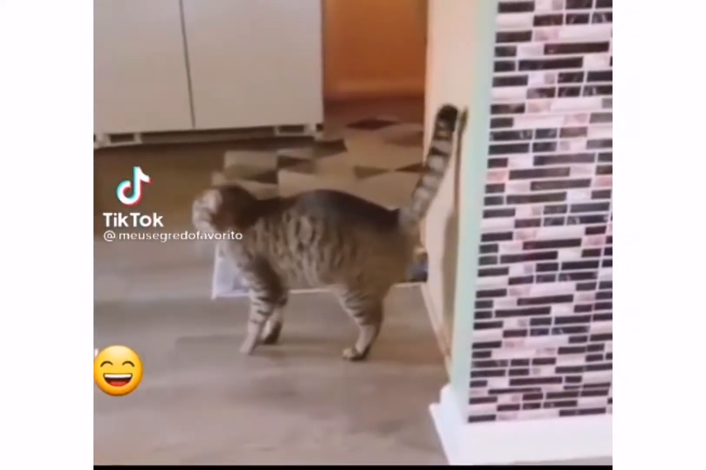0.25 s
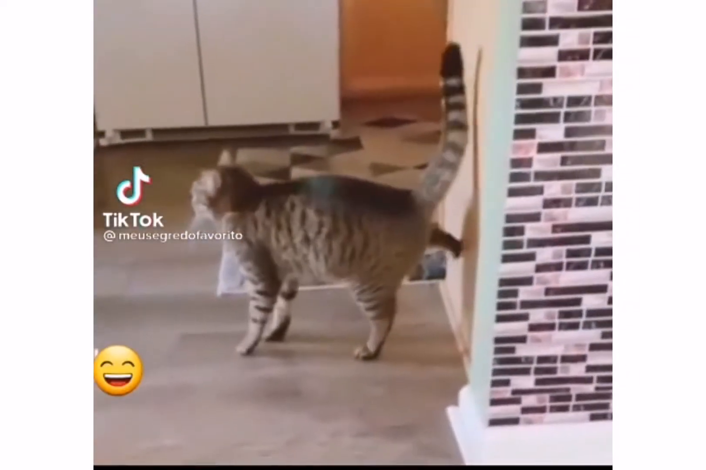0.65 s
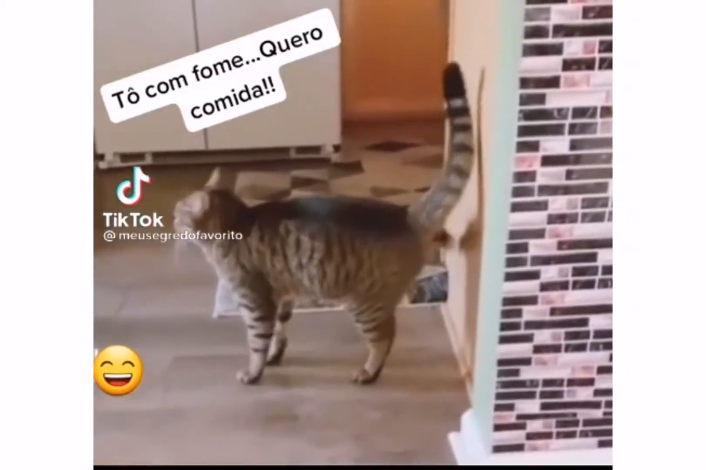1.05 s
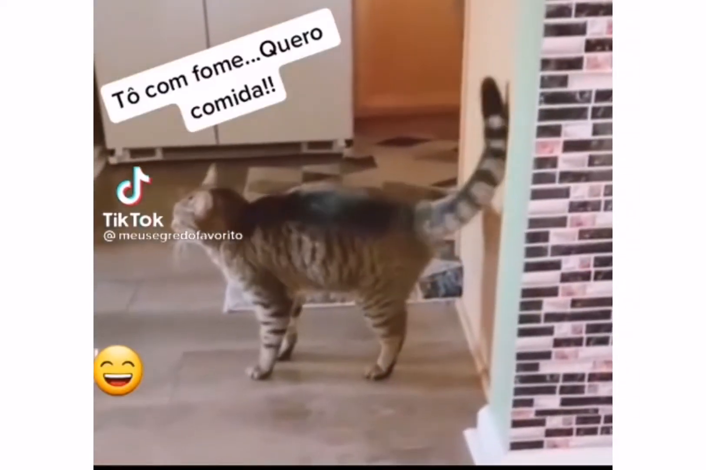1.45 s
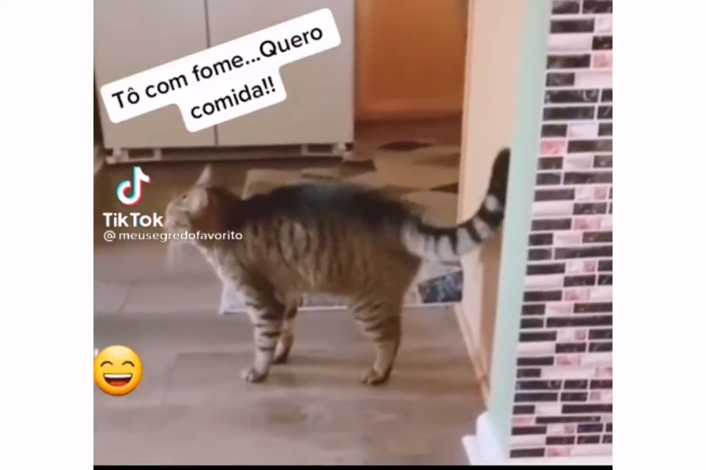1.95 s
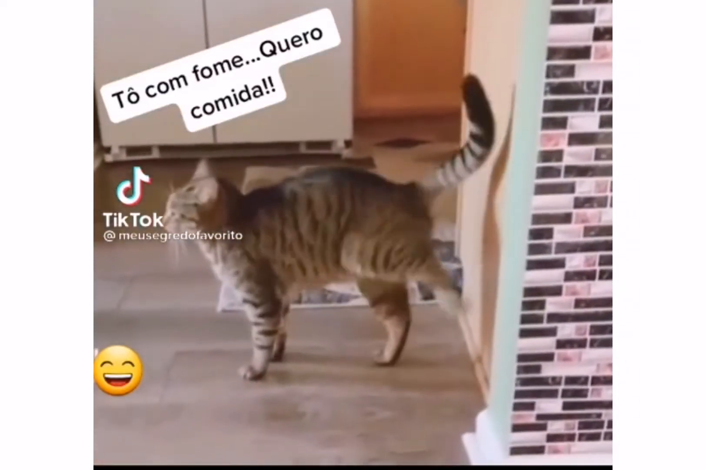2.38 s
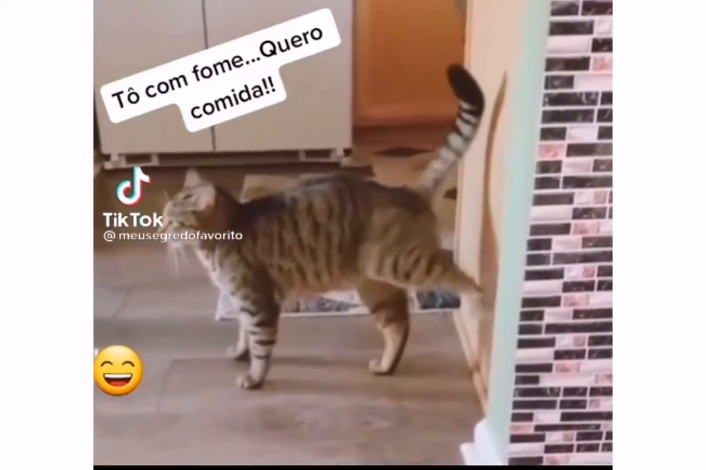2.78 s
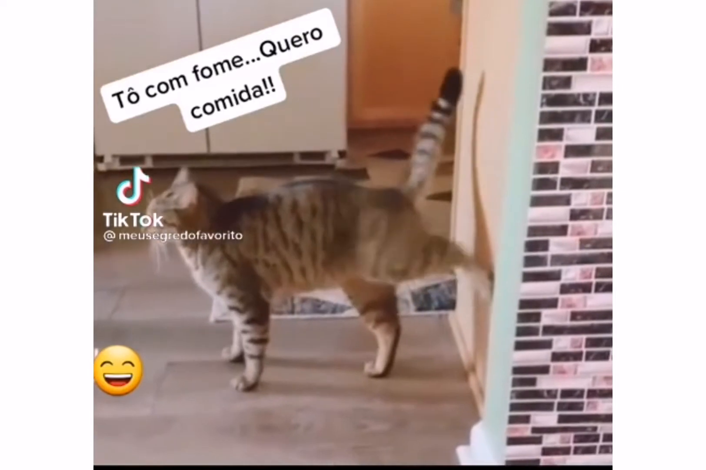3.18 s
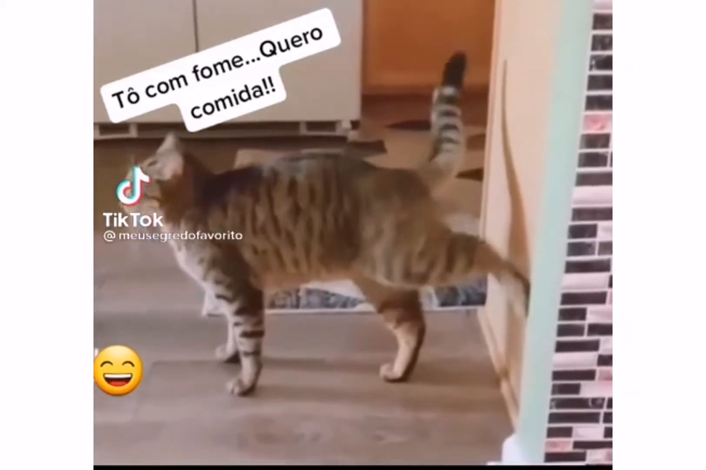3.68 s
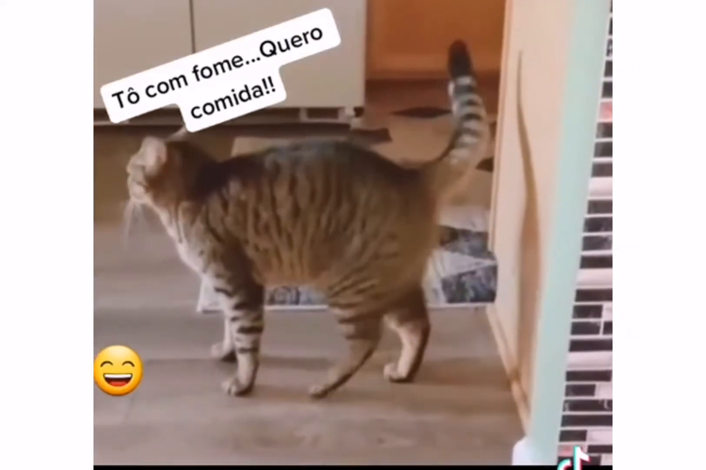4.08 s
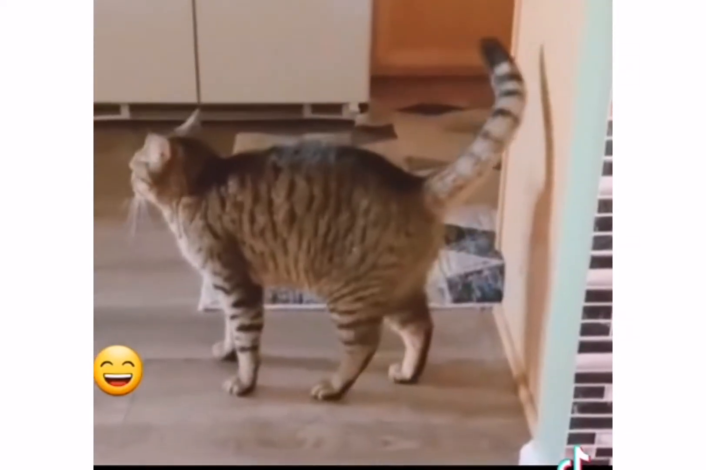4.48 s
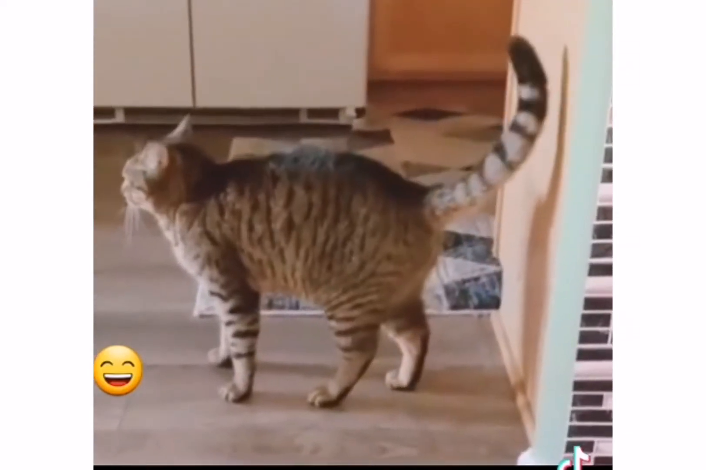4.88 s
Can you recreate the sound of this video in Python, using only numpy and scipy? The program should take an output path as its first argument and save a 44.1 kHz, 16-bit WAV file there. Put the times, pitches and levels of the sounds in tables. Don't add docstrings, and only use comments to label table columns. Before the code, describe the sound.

Fast, boomy paw thumps on a hollow door panel swell, stop, restart and stop, leaving soft ticks in a humming kitchen.

```python
import sys
import numpy as np
from scipy import signal
from scipy.fft import rfft, irfft
from scipy.io import wavfile

SR = 44100
rng = np.random.default_rng(int(sys.argv[2]) if len(sys.argv) > 2 else 0)


def volts_from_db(level):
    exponent = np.asarray(level, float) / 20
    return 10 ** exponent


def pcm_store(signal):
    levels = np.round(np.clip(np.atleast_2d(signal), -1, 1) * 32767)
    wavfile.write(sys.argv[1], SR, levels.astype(np.int16).T)


N = 226669

# panel push in seconds, kick level in dB, claw level in dB,
# pad firmness in dB, lean of the core to its low note in dB.
BOUT_1 = [(0.375, -30.5, -54, -4, 14.5), (0.4543, -14.5, -50, 0.5, 21), (0.538, -10.5, -37, -3, 24.5),
          (0.6217, -9, -39.5, -2.5, 12), (0.7077, -7.5, -38, 0, -15), (0.7987, -7, -36.5, 1.5, 3),
          (0.8783, -7, -40, 0.5, -24.5), (0.9699, -5.5, -36, 2.5, 0), (1.0641, -2, -36, -0.5, -23),
          (1.157, -1, -32, -1.1, -17), (1.261, 0.5, -33, 1, 17), (1.3695, -0.94, -31, 1.1, 19.5),
          (1.4723, 1, -33.5, 2, 0.5), (1.5855, 0.28, -33.5, 2, 5.5), (1.7121, -3.5, -37, 5, 30),
          (1.8437, -5, -36.5, 1, 35.5)]
BOUT_2 = [(2.4249, -31, -74.5, -17.5, 11.5), (2.486, -20, -56, 1, 6.5), (2.555, -15.5, -52, 9, 10.5),
          (2.6257, -10, -43, 5.5, 6.5), (2.707, -7, -36.5, 5.5, -5), (2.7854, -3.5, -29.5, 1.5, -12.5),
          (2.8687, -4.5, -30, 5, -21), (2.9527, -2.5, -33.5, 4, -2), (3.0387, -3, -33.5, 2.1, 12.5),
          (3.1258, -2, -32, -2, 4.5), (3.2164, -3, -32, 2.5, -9.5), (3.3128, -6, -39.5, 3, -3.5),
          (3.4078, -8, -35, 2, -10), (3.5051, -6.5, -33, 1.5, -1), (3.618, -6, -41, -2.5, 6)]
LANDING = [(3.813, -18.5, -53.5, -8, 29)]
# frequency in Hz, level in dB, T60 in seconds,
# start outward +1 or inward -1.
PANEL_MODES_1 = [(34.46, -29, 1, 1), (95.2, -11.5, 0.281, -1), (118.38, -8.5, 0.169, -1),
                 (142.17, -21.5, 0.043, 1), (166.6, -3.5, 0.0604, 1), (209.7, -17, 0.178, 1),
                 (230.5, -13, 0.217, 1), (281, -26.5, 0.219, -1), (352.6, -35.5, 0.717, -1),
                 (440, -25, 0.031, 1), (428, -77.5, 0.197, -1), (563.8, -33.5, 0.063, -1)]
PANEL_MODES_2 = [(27.8, -16, 0.334, 1), (93.3, -14.5, 0.204, 1), (114.66, -11, 0.1436, 1),
                 (118.84, -6, 0.173, 1), (136.96, 2, 0.0594, -1), (154.2, -58, 0.25, -1),
                 (211.8, -8, 0.186, 1), (234.5, -18, 0.451, 1), (272.64, -27, 0.8, 1),
                 (326.1, -21, 0.166, 1), (395.1, -23.5, 0.1296, 1), (440, -25.5, 0.034, 1),
                 (512, -17, 0.0137, -1)]
FOOT_MODES = [(64.5, -11.5, 0.323, 1), (123.9, -7, 0.235, 1), (152.4, -6, 0.223, -1),
              (210.4, -14.5, 0.24, 1), (334.3, -12.5, 0.127, -1), (420, -15, 0.124, 1),
              (472, -16, 0.104, -1), (594, -8.5, 0.0344, 1), (694, -31.5, 0.072, -1)]
# frequency in Hz, density in dB per Hz.
SLAP_COLOUR = [(180, -46), (300, 10.5), (372, 0.5), (584, -7), (787, -3), (1040, -10.5), (1780, -16.5),
               (2650, -22.5), (2880, -18), (3950, -24.5), (12300, -33), (15200, -46), (16000, -63)]
# frequency in Hz, width in Hz, height in dB.
FRAME_PEAKS = [(609.5, 68, 5), (832, 246, -6), (1073.4, 84, 3), (1446, 91, 3), (1940, 98, 2),
               (2455, 213, 4), (2800, 79, 1.5)]
# time in seconds, skin over claws in dB, low core note in Hz,
# its upward glide as a share, high core note in Hz.
PAW_LIE = [(0.499, -7, 498.3, 0.193, 918), (0.78, 3, 492.2, 0.155, 922.2), (1.07, 14.5, 454.8, 0.094, 923),
           (1.14, 12, 616, 0.244, 1091), (1.6, 12.5, 624.2, 0.2723, 1094), (1.851, 8.5, 618.2, 0.215, 1096),
           (2.549, -2.5, 466.3, -0.154, 921), (2.72, 8, 473.6, -0.14, 1013),
           (3.05, 10.5, 442.6, -0.146, 1060), (3.2, 5.5, 467, -0.21, 1214), (3.5, 0.5, 440, -0.189, 1271),
           (3.8, 8, 440, -0.186, 1256)]
# time in seconds, level in dB, length in seconds.
BRUSH = (2.083, -56, 0.024)
# start in seconds, level in dB, length in seconds, ring in dB.
TICKS = [
    (3.61, -35, 0.0153, -4),
    (4.031, -41, 0.0079, -12),
    (4.047, -39, 0.0073, -10.5),
    (4.284, -44, 0.0045, -13),
    (4.364, -40, 0.014, -5.5),
    (4.403, -58.5, 0.0108, -10),
    (4.481, -50.5, 0.006, 2.5),
    (4.4585, -24, 0.00432, -19.5),
    (4.465, -38, 0.0035, -4.5),
]
# frequency in Hz, level in dB, T60 in seconds.
TICK_MODES = [(274.6, 1.5, 0.134), (682.7, 5.5, 0.06), (802.7, -8, 0.116), (874, -5, 0.086),
              (1583.8, 3, 0.134), (2140, 5, 0.025)]
# time in seconds, level in dB.
STEPS = [
    (0.02, -59.5),
    (1.86, -23.5),
    (2.19, -45),
    (3.86, -33.5),
    (4.1, -38.5),
    (4.339, -40.5),
    (4.73, -51.5),
    (5.08, -53.5),
]
# frequency in Hz, T60 in seconds.
ROOM_T60 = [(60, 0.398), (400, 0.544), (1100, 0.357), (3000, 0.274), (8000, 0.192), (14000, 0.13)]
# frequency in Hz, level in dB.
FRIDGE_LINES = [(59.2, -55.5), (118.4, -56), (306.8, -64), (382.2, -67), (457.6, -60), (952.8, -74.5),
                (1523, -75), (3628, -79.5), (5650, -81.0)]
# frequency in Hz, density in dB per Hz.
AIR_COLOUR = [(15, -25), (25, 7), (40, -5), (60, 6.5), (85, -7.5), (123, -4.5), (160, -8.5), (300, -9.5),
              (420, -14), (574, -14.5), (900, -18), (3160, -28.5), (9000, -34), (12000, -33)]
# time in seconds, level in dB, hiss tilt above 2 kHz in dB per octave.
AIR_LEVEL = [(0, -46, 2.5), (.35, -48, 1), (2.2, -49, 0), (3.9, -48.5, 0.54), (4.4, -49.5, 0.36),
             (5.14, -49.5, 0.5)]

THIRD_OCTAVES_HZ = 25 * 2 ** np.arange(0, 9.5, 1 / 3)
PANEL_LAG_S, CORE_UNDER_KICK_DB = (0.003091, 0.000524, -0.00104), (-11.5, -14.5, -4)


def rms_one(x):
    return x / np.sqrt(np.mean(x ** 2) + 1e-20)


def at_hz(points, hz):
    points_hz, values = np.array(points)[:, 0], np.array(points)[:, 1]
    return np.interp(np.log(hz), np.log(points_hz), values)


def band(x, low_hz, high_hz):
    return signal.sosfilt(signal.butter(2, [low_hz, high_hz], "band", fs=SR, output="sos"), x)


def drift(rate_hz):
    knots = rng.standard_normal(int(N / SR * rate_hz) + 2)
    return np.interp(np.arange(N) / SR * rate_hz, np.arange(len(knots)), knots)


def ring(clicks, hz, t60_s):
    radius, w = volts_from_db(-60 / (t60_s * SR)), 2 * np.pi * hz / SR
    return signal.lfilter([0, np.sin(w)], [1, -2 * radius * np.cos(w), radius ** 2], clicks + 1e-18)


def struck(modes, events, spread_db, contact_s):
    at = [round(row[0] * SR) for row in events]
    blow_db = np.array(events)[:, 1]
    chance = rng.standard_normal((len(at), len(modes)))
    out = np.zeros(N)
    for k, (hz, level_db, t60_s, *sign) in enumerate(modes):
        clicks = np.zeros(N)
        clicks[at] = volts_from_db(blow_db + level_db + spread_db * chance[:, k]) * np.sign(sign or 1)
        out += ring(clicks, hz, t60_s)
    contact = np.hanning(round(contact_s * SR) + 3)
    return np.convolve(out, contact / contact.sum())[:N]


def bursts(times_s, levels_db, lengths_s, grain_db):
    envelope = np.zeros(N)
    for s, level_db, length_s in zip(times_s, levels_db, lengths_s):
        start = round(s * SR)
        t = np.arange(min(round(.08 * SR), N - start)) / SR
        attack = 1 - np.exp(-t / 0.000911)
        decay = np.exp(-(t / max(length_s, .001)) ** 0.64)
        envelope[start:][:len(t)] += volts_from_db(level_db) * attack * decay
    grains = rng.standard_normal(N) * volts_from_db(grain_db * drift(1500))
    return envelope * rms_one(grains)


def colour(x, low_hz, high_hz):
    hz = np.maximum(np.arange(N // 2 + 1) * SR / N, 1)
    peaks_db = sum(db / (1 + (2 * (hz - f) / width) ** 2) for f, width, db in FRAME_PEAKS)
    gain = volts_from_db(at_hz(SLAP_COLOUR, hz) + peaks_db)
    gain = gain / np.sqrt((1 + (low_hz / hz) ** 6) * (1 + (hz / high_hz) ** 6))
    size = 2048
    coarse = np.interp(np.linspace(0, SR / 2, size + 1), hz, rms_one(gain))
    cepstrum = irfft(np.log(coarse + 1e-6))
    cepstrum[1:size] *= 2
    cepstrum[size + 1:] = 0
    return signal.fftconvolve(x, irfft(np.exp(rfft(cepstrum))))[:N]


def fridge():
    t, out = np.arange(N) / SR, 0
    for hz, db in FRIDGE_LINES:
        level = np.sqrt(2) * volts_from_db(db + 2.2 * drift(10))
        out = out + level * np.sin(2 * np.pi * hz * t + 1.25 * drift(6.5))
    return out


def air():
    s, level_db, tilt = np.transpose(AIR_LEVEL)
    t, out, white = np.arange(N) / SR, 0, rng.standard_normal((2, N))
    for k, (low, high) in enumerate(zip(THIRD_OCTAVES_HZ, THIRD_OCTAVES_HZ[1:])):
        hz = np.sqrt(low * high)
        hiss_db = np.interp(t, s, tilt) * max(np.log2(hz / 2000), 0)
        flicker_db = 3.36 * (200 / hz) ** 0.307 * drift(11)
        out = out + volts_from_db(at_hz(AIR_COLOUR, hz) + hiss_db + flicker_db) * band(white[k % 2], low, high)
    out = signal.sosfilt(signal.cheby2(12, 26, 13100, fs=SR, output="sos"), out)
    return volts_from_db(np.interp(t, s, level_db)) * rms_one(out)


def floorboards():
    shudder = band(band(rng.standard_normal(N), 38.6, 81.2), 38.6, 81.2)
    follow, swell_s, still_db = 0.52, 0.0257, -74
    shakes = list(STEPS)
    for bout, shake_db in ((BOUT_1, -30.5), (BOUT_2, -24)):
        shakes += [(row[0], shake_db + follow * row[1]) for row in bout]
    s, level_db = np.transpose(shakes)
    coarse = np.arange(0, N, 64)
    since = np.maximum(coarse / SR - s[:, None], 0) / swell_s
    envelope = volts_from_db(still_db) + volts_from_db(level_db) @ (since * np.exp(1 - since))
    return volts_from_db(-4.5) * np.interp(np.arange(N), coarse, envelope) * rms_one(shudder)


def touches():
    rows = []
    for group, lag_s, core_db in zip((BOUT_1, BOUT_2, LANDING), PANEL_LAG_S, CORE_UNDER_KICK_DB):
        for s, kick_db, claw_db, pad_db, lean_db in group:
            length_s = 0.007332 * volts_from_db(0.514 * (kick_db - 30.5 - claw_db))
            knock_db = claw_db + 22.5 + pad_db
            rows.append((s - lag_s, kick_db + core_db + pad_db, claw_db, knock_db, lean_db, length_s))
    s, *levels, length_s = np.transpose(rows)
    return s, *levels, length_s, s - 0.509 * (length_s - .006)


def paw(s):
    at, *columns = np.transpose(PAW_LIE)
    return [np.interp(s, at, column) for column in columns]


def slaps():
    _, _, claw_db, knock_db, _, length_s, s = touches()
    knock = colour(bursts(s + 0.00136, knock_db - 7.5, 1.174 * length_s, grain_db=-2.0), 501.6, 1403)
    slap_db = claw_db + paw(s)[0] + 4.5
    slap = colour(bursts(s - .001, slap_db, 0.599 * length_s, grain_db=4.5), 1725, 3347)
    s, claw_db, length_s = np.c_[[s, claw_db, length_s], BRUSH]
    scratch = colour(bursts(s - .002, claw_db + 5.0, 0.583 * length_s, grain_db=3.5), 3876, 22700.0)
    return knock + slap + scratch


def panel_boom():
    first = struck(PANEL_MODES_1, BOUT_1, spread_db=1.02, contact_s=0.000635)
    second = struck(PANEL_MODES_2, BOUT_2, spread_db=2.15, contact_s=0.00104)
    return first + second


def hollow(times_s, levels_db, pitches_hz, t60_s, rises):
    out, t = np.zeros(N), np.arange(round(.2 * SR)) / SR
    swell_in_s, glide_s = 0.00995, 0.01541
    swell = (1 - np.exp(-t / swell_in_s)) ** 2
    for s, level_db, hz, rise in zip(times_s, levels_db, pitches_hz, rises):
        cycles_s = t - rise * glide_s * (1 - np.exp(-t / glide_s))
        note = swell * volts_from_db(level_db - 60 * t / t60_s) * np.sin(2 * np.pi * hz * cycles_s)
        out[round(s * SR):][:len(t)] += note
    return out


def core():
    s, core_db, _, _, lean_db, *_ = touches()
    _, low_hz, rise, high_hz = paw(s)
    low_db = core_db - 10 * np.log10(1 + volts_from_db(-2 * lean_db))
    high_db = core_db - 10 * np.log10(1 + volts_from_db(2 * lean_db))
    low = hollow(s + 0.001386, low_db + 5.5, low_hz, 0.0714, rise)
    high = hollow(s - .003, high_db + 10, high_hz, 0.0389, 0.086 * rise)
    return low + high


def kitchen(x):
    t, tail = np.arange(round(.6 * SR)) / SR, 0
    white = rng.standard_normal((len(THIRD_OCTAVES_HZ), len(t)))
    for noise, low, high in zip(white, THIRD_OCTAVES_HZ, THIRD_OCTAVES_HZ[1:]):
        t60_s = at_hz(ROOM_T60, low)
        clump_db = 3.5 * (low > 900) * drift(90)[:len(t)]
        dying = band(noise, low, high) * volts_from_db(-60 * t / t60_s + clump_db)
        build_up = 1 - np.exp(-(t / 0.00993) ** 2)
        tail = tail + rms_one(dying * build_up) * np.sqrt(low * t60_s)
    return signal.fftconvolve(x, tail / np.sqrt(np.sum(tail ** 2)))[:N]


def ticks():
    s, level_db, length_s, ring_db = np.transpose(TICKS)
    scuff = colour(bursts(s, level_db - 9.5, length_s, grain_db=3.5), 1100, 7900)
    blows = np.transpose([s, level_db + ring_db - 2.0])
    return scuff + struck(TICK_MODES, blows, spread_db=3.5, contact_s=0.000175)


def paw_landing():
    return struck(FOOT_MODES, LANDING, spread_db=0.2, contact_s=0.0006)


def scene():
    boom = panel_boom()
    bright = slaps() + ticks()
    notes = core() + paw_landing()
    wet = kitchen(volts_from_db(-7.5) * bright + volts_from_db(-11.5) * notes + volts_from_db(-12) * boom)
    return (boom + bright + notes + wet + floorboards() + fridge() + air())[None]


def top_cut(x):
    return signal.sosfilt(signal.butter(12, 16610, fs=SR, output="sos"), x)


def record(dry):
    mix = signal.sosfilt(signal.butter(2, 18, "high", fs=SR, output="sos"), dry)
    mix = np.clip(mix, -.97, .97)
    mix = signal.sosfilt(signal.cheby2(12, 50, 16400, fs=SR, output="sos"), mix)
    return top_cut(mix)


dry = scene()
out = record(dry)
pcm_store(out)
```